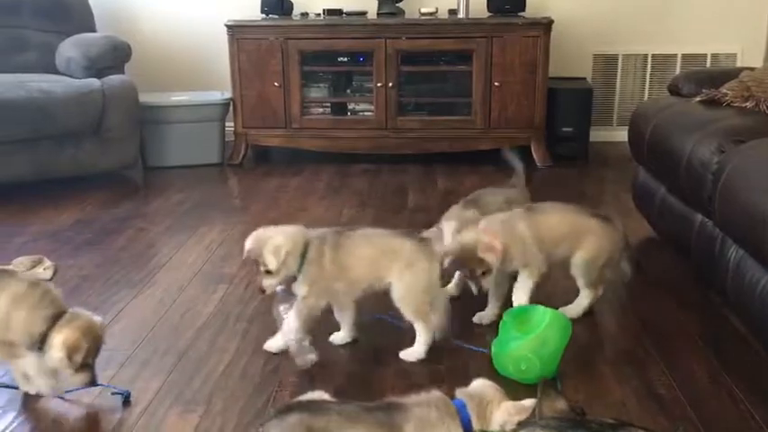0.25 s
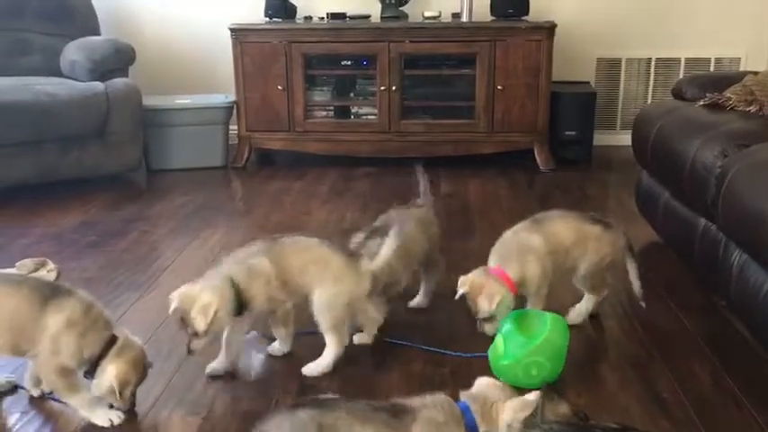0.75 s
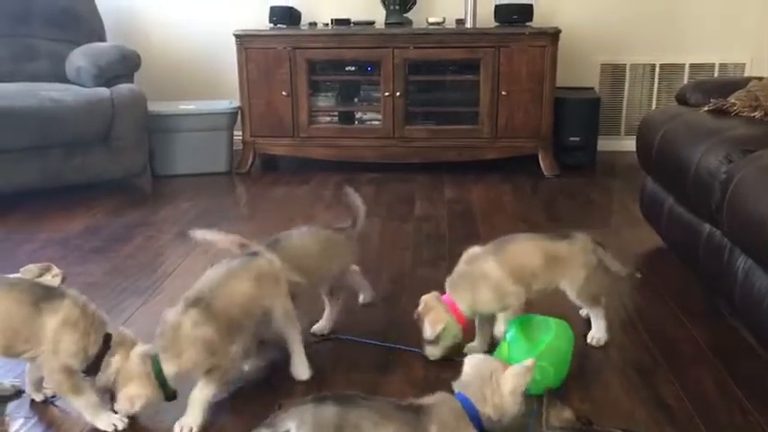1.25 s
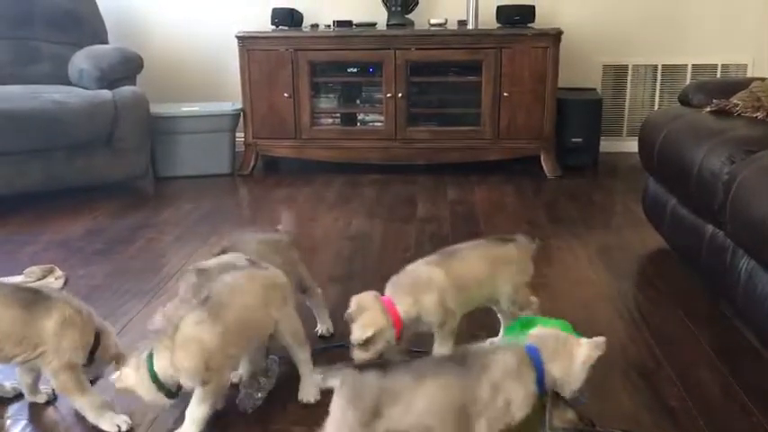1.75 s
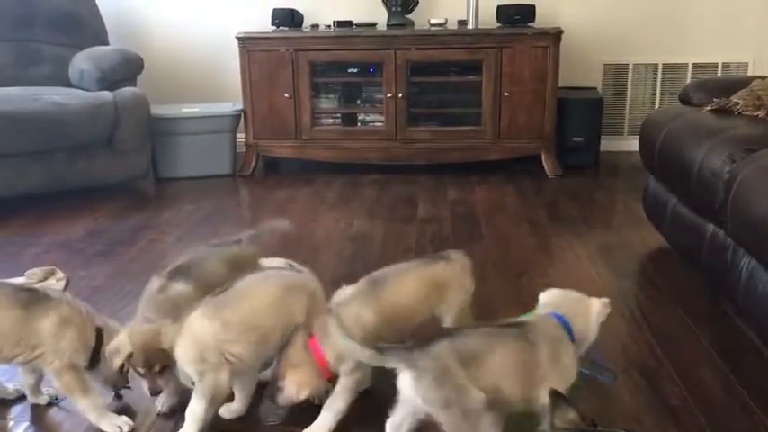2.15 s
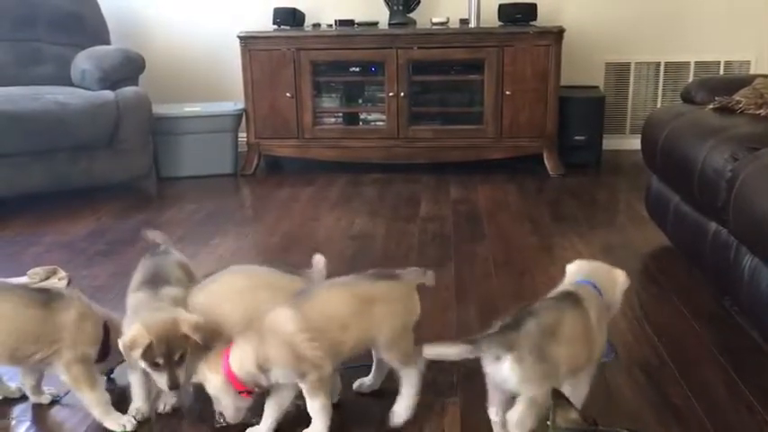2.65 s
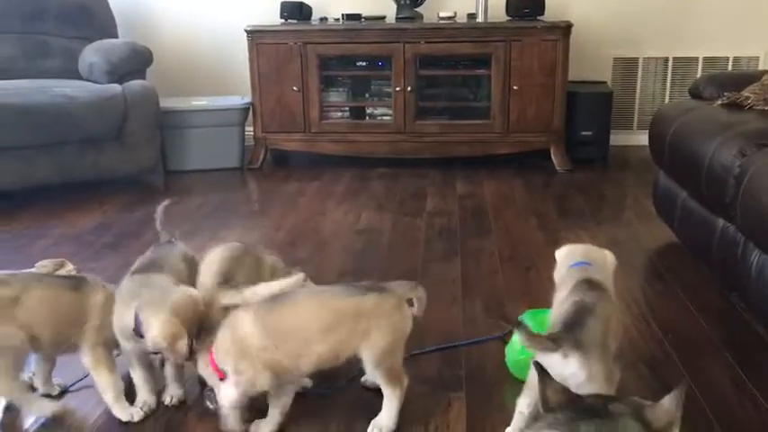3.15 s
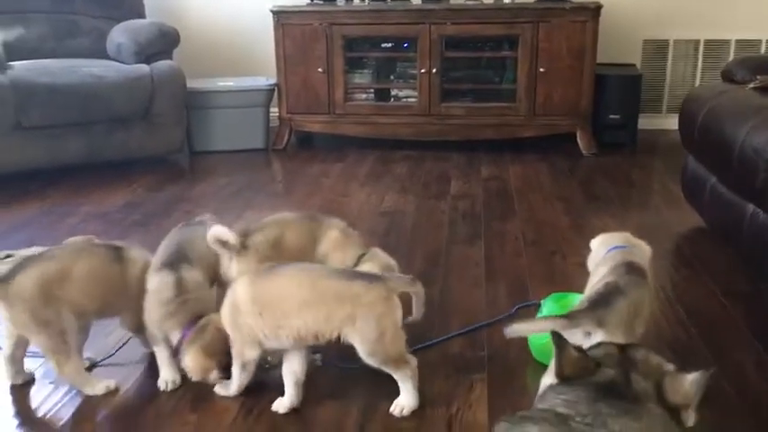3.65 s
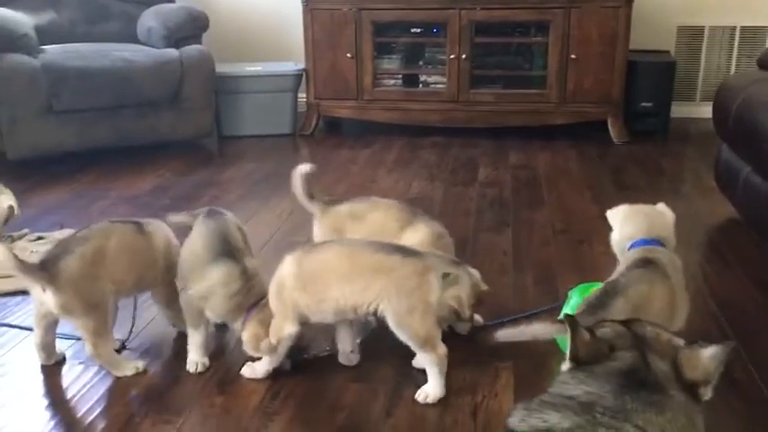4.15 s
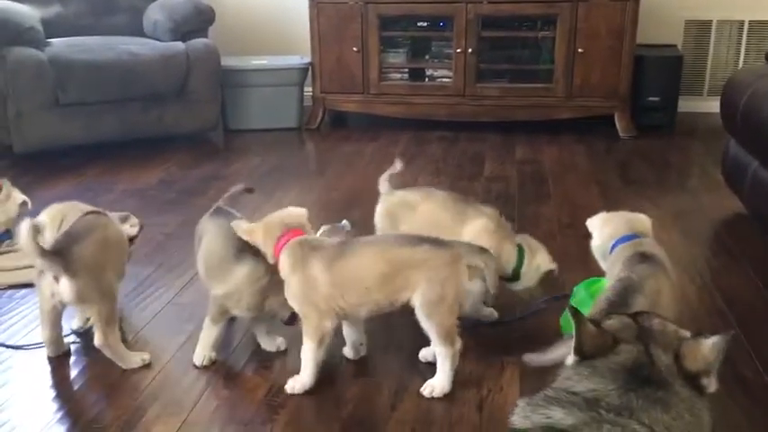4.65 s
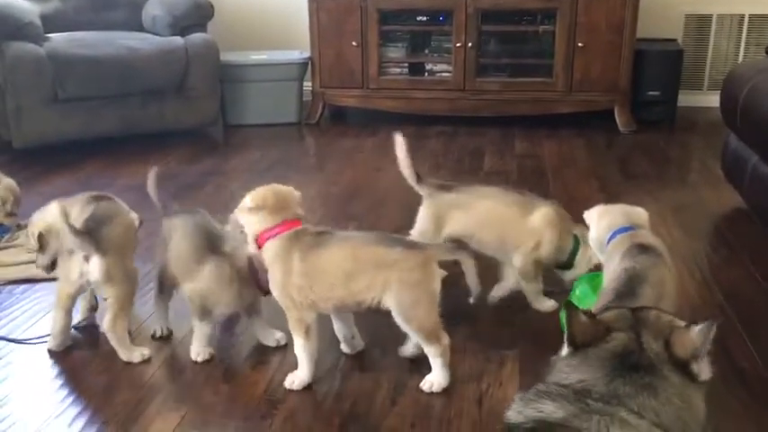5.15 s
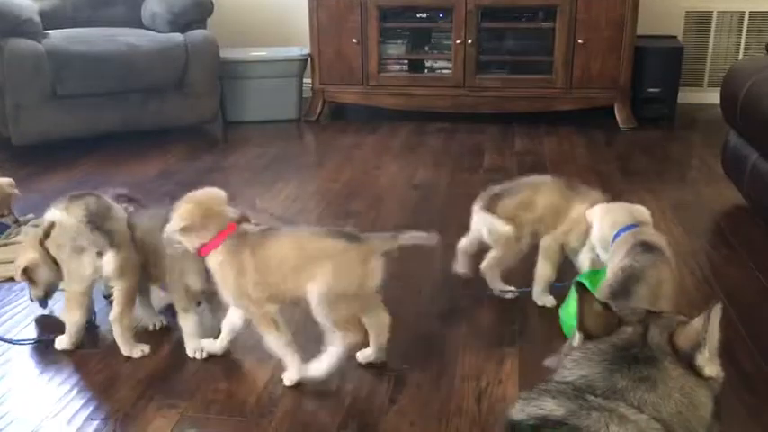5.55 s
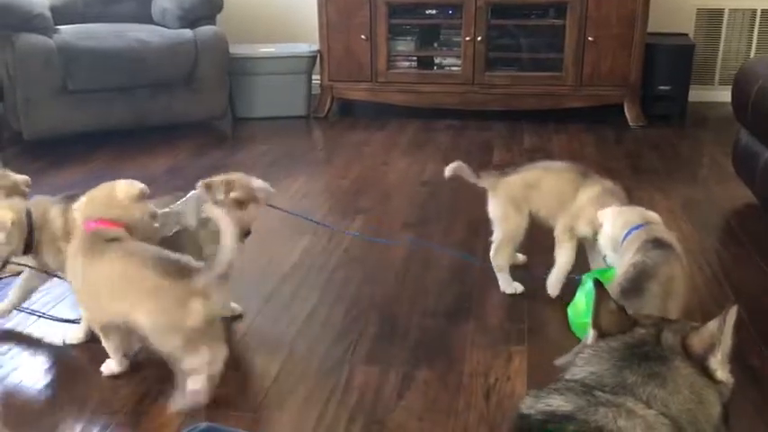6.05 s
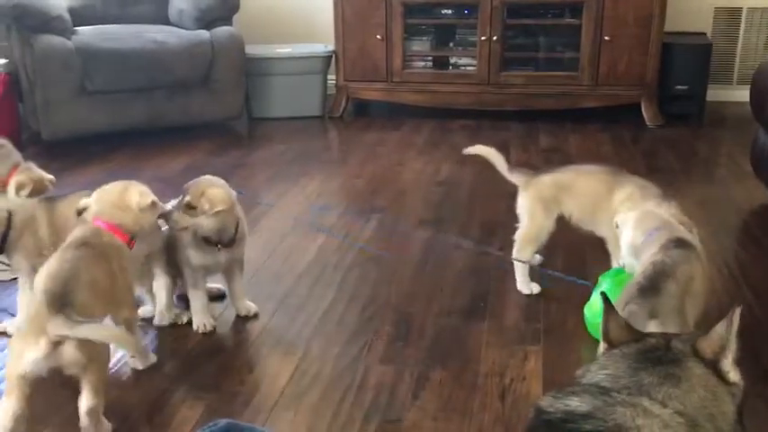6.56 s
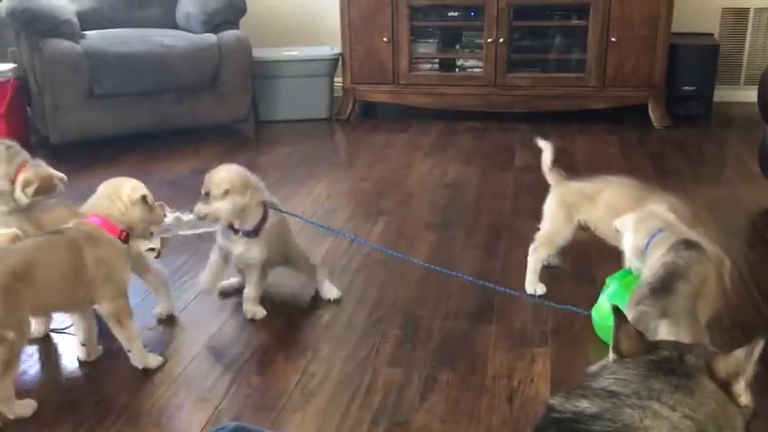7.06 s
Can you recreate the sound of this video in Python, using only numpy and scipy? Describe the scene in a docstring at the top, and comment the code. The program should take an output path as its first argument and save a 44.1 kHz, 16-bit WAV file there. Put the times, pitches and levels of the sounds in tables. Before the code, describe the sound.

Puppies tussle over a thin plastic bottle on hardwood, its sharp crackles and pops mixed with paw thuds, claw ticks and scuffling in a live room.

```python
"""Thin plastic crackles with much room at first, drier from about 2.5 s and wet again near 6.5 s: puppies
tussle on hardwood. Each snap of their bottle is a noise burst plus panel and bottle rings; its edge judders as
ringing catches that weaken towards the end. Paws and toys thud and set boards ringing; a hollow toy answers
bumps with modes. Claws tick, and random slips make the scrapes and scuffling between blows; the scuffling
follows the litter. Soft floor booms, low rumble and faint hiss lie beneath; a live room and a phone microphone
colour the mix."""
import sys
import numpy as np
from scipy import signal
from scipy.fft import rfft, irfft, next_fast_len
from scipy.io import wavfile
from scipy.ndimage import uniform_filter1d

SR = 44100
rng = np.random.default_rng(int(sys.argv[2]) if len(sys.argv) > 2 else 0)


def dump(signal):
    """Clip the signal to [-1, 1] and save it as 16-bit WAV at the path in sys.argv[1]."""
    limited = np.clip(np.atleast_2d(signal).T, -1, 1)
    pcm = np.round(limited * 32767).astype(np.int16)
    wavfile.write(sys.argv[1], SR, pcm)


N = 321930
TIME = np.arange(N) / SR  # s

# Table levels are relative: the functions below trim, scatter or normalise them.
# bottle wall buckling: t/s, level/dB, ring f/Hz, ring level/dB, body tilt/dB, treble tilt/dB
SNAPS = [(0.018, -30, 1770, -1.5, -2.5, 1), (0.4037, -52, 3370, 9, -26, 3), (0.4612, -47, 3420, 3, 4, 2),
         (0.5141, -24, 1470, -17, -0.5, -1), (0.6202, -30, 880, -8, 4.5, -6.5),
         (0.8491, -28.5, 850, -7, 11, -8.5), (1.0425, -36.5, 1500, -12, 8, -4),
         (1.0677, -29, 755, 0.5, -3, -2), (1.0785, -41, 800, 0, 14, -8),
         (1.1504, -31.5, 2320, -0.5, 4.5, -15), (1.342, -39.5, 3220, -15, 12, -1.5),
         (1.4916, -49, 3800, -1, -16, 0), (1.5046, -41, 1150, -19, 4, -25), (2.217, -38, 1450, -6, 4, -7),
         (2.431, -51.5, 3060, -6, -2, -1), (2.5611, -31.5, 2320, -7.5, -3.5, -5),
         (2.7402, -33, 8800, -3, 0, 8), (2.842, -38, 2280, -4.5, -7, 3.5), (3.067, -31, 4200, -5.5, 5, 4),
         (3.0748, -34.5, 1110, -1.5, 7, 0), (3.3068, -34.5, 660, -0.5, 13, -45),
         (3.3392, -39, 1260, -18, 2, -15.5), (3.3697, -35, 6570, -2, 1.5, 1),
         (3.376, -30, 2310, -12, 3.5, 0.5), (3.4761, -29, 3730, -3, -9, 15),
         (3.489, -34.5, 3430, -2, 10, 4), (3.5452, -36, 8150, 0, 5, 5),
         (3.655, -32.5, 800, -0.5, -0.5, -10), (3.661, -41.5, 4270, 0.5, -8, 2),
         (3.955, -42, 780, -2, -2, -13), (3.9778, -31, 2100, -10, 7.5, -0.5),
         (3.99, -32, 1620, -12, -7, -35), (4.0992, -46, 2110, -6, 19, 21), (4.2584, -51, 3400, -2, 10, -12),
         (5.1499, -56, 2200, -10, -4, 5), (5.364, -49.5, 1240, 0, -9, -7),
         (5.6589, -37.5, 3940, -8.5, 2, 1.5), (5.8525, -47, 794, -6, 8, -51),
         (5.9093, -45.5, 1870, -11, -5, 2), (5.9234, -37.5, 1900, -8, 6.5, 6),
         (5.9305, -37, 1520, -11, 0, -2), (5.972, -39, 1490, -14, -13, -1),
         (5.9813, -33, 1400, -8.5, -4.5, -0.5), (6.0742, -38, 9450, 6, -8, -1),
         (6.1133, -33.5, 1340, -1, -13, 1), (6.1405, -30, 8100, 0, -2.5, 9),
         (6.1592, -38.5, 6900, 5, 1, 11), (6.3716, -42, 4040, 1, -18, 4), (6.382, -41.5, 2100, 0, -15, -1),
         (6.457, -42, 1650, -25, -1.5, -8.5), (6.853, -46, 1300, -0.5, 1.5, -21),
         (6.9192, -48, 3570, 5, -3, 1), (7.2555, -29, 1530, 6.5, -9, 1)]
# bottle crushed between jaws: start t/s, length t/s, crease level/dB, ring f/Hz
CRUMPLES = [(0.0, 0.017, -40.5, 7400), (1.067, 0.041, -54, 3150), (4.199, 0.08, -58, 3040),
            (5.989, 0.075, -45.5, 2950), (6.145, 0.045, -45.5, 8100)]
# spectrum of a snap: f/Hz, level/dB
PLASTIC_COLOUR = [(60, -31.5), (200, -3.5), (400, -10.5), (750, -3.5), (1100, -4), (2000, -1), (3000, -7),
                  (5000, -4), (7000, -3), (9300, -0.5), (10500, -9), (12500, -17), (16000, -30)]
# modes of the whole bottle: f/Hz, level/dB, t60/s
BOTTLE_MODES = [(815, 0, 0.21), (910, 6, 0.019), (1105, 1, 0.05), (1298, 2, 0.12), (1545, 11, 0.033),
                (1810, -28, 0.12), (2480, -12, 0.094), (3607, 20, 0.012)]
# room's share of the snaps, creases and claw ticks: t/s, level/dB
BOTTLE_ROOM = [(0, 4), (0.6, 2), (1.0, 1), (2.5, -3.5), (4.0, -2), (5.9, 1), (6.45, 4), (7.25, -1)]
# bottle edge juddering over boards or teeth: start t/s, length t/s, level/dB, ring f/Hz
JUDDERS = [(1.148, 0.13, -59, 2360), (1.157, 0.16, -49, 1570), (1.413, 0.046, -50, 3480),
           (2.567, 0.076, -48, 2370), (2.569, 0.044, -46, 2860), (2.85, 0.09, -53, 2380)]
# paws and toys landing on the boards: t/s, level/dB, ring f/Hz, ring level/dB, hardness/dB
KNOCKS = [(0.162, -46, 169, 1.5, -35), (0.23, -46.5, 839, -3.5, 8.5), (0.517, -37, 819, 12, -15),
          (0.622, -35, 207.7, 8, -16), (0.814, -44, 156, -2, 13), (0.85, -30, 394.4, 0, -1.5),
          (0.93, -45, 202, 9, 3), (0.975, -45, 383, 5, 13), (1.043, -32.5, 500.6, -1.5, 3),
          (1.068, -44, 234, 0, 1), (1.1215, -30.5, 665, 6.5, 14), (1.344, -39.5, 206.4, -4, 1),
          (1.412, -48, 212, -16, -3), (1.505, -37.5, 332, 0.5, 1.5), (2.219, -43, 312, -3, 7.5),
          (2.229, -42, 212, -3, 3), (2.69, -52, 365, -1, 4.5), (2.811, -46.5, 200, -6, 9.5),
          (2.94, -47.5, 354, -5, -6), (2.957, -49, 427, -7, 8), (3.228, -51, 490, 6, -1),
          (3.307, -44.5, 428, 0, -1), (3.378, -47.5, 191, 6, -26), (3.89, -52, 650, -12, 18),
          (4.37, -58, 399, -6, 3), (4.471, -59, 510, 9, 0), (4.655, -52.5, 191, 22, -36),
          (5.512, -59.5, 300, -0.5, 7), (6.05, -53, 528, 7, 5), (6.138, -55, 205, -4, 4),
          (6.456, -49.5, 310, -8, 2), (6.773, -55, 342, -2, -4), (7.089, -55, 520, -1, 2),
          (7.132, -50.5, 483, 1, 2.5)]
# modes of the floorboards: f/Hz, level/dB, t60/s
BOARD_MODES = [(206.4, 0.5, 0.41), (280, -2.5, 0.37), (391, -9.5, 0.21), (568, 1.5, 0.17), (687, -12, 0.36),
               (744, 14, 0.024), (799, -6.5, 0.31), (930, -17, 0.31), (1090, -15, 0.42), (1460, -11, 0.35)]
# hollow toy being bumped: t/s, level/dB
BUMPS = [(1.07, -42), (1.124, -40), (1.163, -48), (2.219, -46.5), (6.458, -45.5), (7.135, -58)]
# modes of the hollow plastic toy: f/Hz, level/dB, t60/s
TOY_MODES = [(571, -4, 0.19), (641, 3.5, 0.11), (743, -1, 0.2), (787, -7, 0.32), (829, -10, 0.3),
             (930, -16, 0.21)]
# claws and plastic sliding over the boards: start t/s, length t/s, level/dB, centre f/Hz
SCRAPES = [(0.0, 0.008, -26, 5600), (0.12, 0.18, -48.5, 1340), (0.394, 0.058, -55, 3340),
           (0.513, 0.04, -48, 12000), (0.522, 0.2, -43.5, 1190), (0.908, 0.11, -54.5, 10800),
           (1.315, 0.035, -54, 12100), (1.384, 0.43, -62, 3860), (1.764, 0.062, -56.5, 2800),
           (2.028, 0.074, -59, 6200), (2.138, 0.099, -59.5, 8750), (2.193, 0.1, -53, 1500),
           (2.218, 0.022, -42, 3100), (2.429, 0.18, -51.5, 3820), (2.797, 0.072, -50, 1350),
           (2.94, 0.085, -54, 4160), (3.666, 0.24, -55.5, 1040), (4.187, 0.11, -53, 1470),
           (4.19, 0.09, -71, 4200), (4.561, 0.12, -65.5, 3900), (6.376, 0.064, -56, 5800),
           (6.736, 0.25, -61.5, 6860), (7.219, 0.025, -48.5, 1410), (7.219, 0.027, -52, 4970)]
# how busy the litter is: t/s, scuffling level/dB
BUSTLE = [(0, -57.5), (1.25, -55.5), (1.5, -51.5), (1.9, -61.5), (2.4, -50.5), (3.6, -53.5), (4.25, -52),
          (4.5, -73.5), (5.3, -66), (5.5, -58), (6.2, -57.5), (6.7, -57), (7.3, -52.5)]
# spectrum of the steady background: f/Hz, density level/dB per Hz
AIR_COLOUR = [(31, -23), (44, -13.5), (62, -14.5), (100, -19), (160, -26.5), (290, -25.5), (400, -37),
              (1600, -45.5), (4000, -50), (9000, -58), (16000, -62)]
# spectrum of the room's answer: f/Hz, level/dB
ROOM_COLOUR = [(100, -3.5), (300, 1), (800, 5), (2200, -1), (8000, -3.5), (11000, -4.5), (16000, -11)]
# decay of the room's tail: f/Hz, t60/s
ROOM_T60 = [(150, 0.65), (700, 0.4), (2200, 0.64), (5000, 0.56), (9000, 0.39), (15000, 0.42)]
# response of the phone's microphone: f/Hz, level/dB
MICROPHONE = [(18, -23), (45, 0.5), (9600, 0), (10600, -1), (12500, 4)]


def snaps(spots, rise_s=0.0018, flip_t60=0.0088, chatter_t60=0.033, chatter_db=-6,
          ring_cycles=10, ring_room_db=-4, bottle_db=-9, gain_db=23):
    """A wall flips fast, its creases chatter, and the panel and whole bottle ring; claw ticks share this voice."""
    out = np.zeros(N)
    t = np.arange(4096) / SR
    events = SNAPS + creases() + claws()
    for k, (s, db, hz, ring_db, body_db, treble_db) in enumerate(events):
        flip, chatter = rng.standard_normal((2, len(t)))
        flip = np.tanh(flip) * np.minimum(t / rise_s, 1) * fade(t, flip_t60)
        chatter = chatter ** 3 * fade(t, chatter_t60)  # cubing leaves sparse, spiky crackle
        bottle = unit(modes(t, BOTTLE_MODES, scatter_octaves=0.033))
        push = unit(flip) + undb(chatter_db) * unit(chatter) + undb(bottle_db) * bottle

        tilt = [(1000, body_db - 2.0), (1900, 0.012), (3300, 0), (5500, treble_db - 3.5),
                (9000, treble_db - 9.0), (13000, treble_db - 0.4)]
        crack = unit(colour(push, PLASTIC_COLOUR, tilt))
        panel = undb(ring_db) * flex(t, hz, ring_cycles)

        # summed over all directions the crack has a more even spectrum
        click = unit(colour(signal.unit_impulse(len(t)), PLASTIC_COLOUR, tilt))
        spread = unit(click + 0.26 * crack)
        room_gain = undb(follow(s, BOTTLE_ROOM))
        radiated = room_gain * unit(spread + undb(ring_room_db) * panel)
        size = undb(db + gain_db)
        place(out, s, size * unit(crack + panel), size * radiated, spots[k % len(spots)])
    return out


def creases(count=6, scatter_db=3, scatter_octaves=0.11, ring_db=-3, body_db=-10, treble_db=0):
    """Each crumple is a run of small thin snaps, uneven in spacing, size and pitch."""
    events = []
    for s, length, db, hz in CRUMPLES:
        for k in range(count):
            at = s + length * (k + rng.random()) / count
            level = db + scatter_db * rng.standard_normal()
            pitch = hz * 2 ** (scatter_octaves * rng.standard_normal())
            events.append((at, level, pitch, ring_db, body_db, treble_db))
    return events


def flex(t, hz, cycles, swell_cycles=1.42):
    """A thin panel's ring builds up over a cycle or so and dies away after a set number of cycles."""
    swell = 1 - np.exp(-(t * hz / swell_cycles) ** 2)
    return unit(ring(t, hz, cycles / hz) * swell)


def judders(catch_s=0.0067, scatter_db=4, scatter_octaves=0.079, ring_cycles=26):
    """The edge catches and lets go at uneven intervals, ringing a panel each time, more weakly towards the end."""
    out = np.zeros(N)
    t = np.arange(2048) / SR
    for s, length, db, hz in JUDDERS:
        gaps, sizes, pitches = rng.standard_normal((3, 64))
        catches = np.cumsum(catch_s * np.exp(gaps / 2)) - catch_s
        for at, size, pitch in zip(catches[catches < length], sizes, pitches):
            strength = undb(db + scatter_db * size) * np.sqrt(catch_s * SR * (1 - at / length))
            panel = flex(t, hz * 2 ** (scatter_octaves * pitch), ring_cycles)
            add(out, s + at, strength * panel)
    return out


def knocks(spots, rise_s=0.0019, contact_t60=0.088, note_t60=0.2, note_hz=300, boards_db=-1,
           room_db=-3, note_room_db=-6, firm_db=-40, doubling_db=18, gain_db=31):
    """A blunt contact thuds, the thing that lands gives its own hollow note, and the boards ring on."""
    out = np.zeros(N)
    t = np.arange(SR // 3) / SR
    for k, (s, db, hz, ring_db, hard_db) in enumerate(KNOCKS):
        # a light paw stays down and damps what it has set ringing
        free = 2 ** (min(db - firm_db, 0) / doubling_db)
        rise = np.minimum(t / rise_s, 1)
        contact = rng.standard_normal(len(t)) * rise * fade(t, contact_t60 * free)
        boards = modes(t, BOARD_MODES)
        hardness = [(30, -69), (90, -8.5), (180, 3), (380, 4.0), (600, hard_db - 2),
                    (900, hard_db - 9.0), (1500, hard_db - 12.0), (2500, hard_db - 25.5),
                    (3200, hard_db - 13.5), (9000, hard_db - 39.5)]
        boards = free * undb(boards_db) * unit(colour(boards, hardness))
        thud = unit(unit(colour(contact, hardness)) + boards)

        t60 = free * note_t60 * np.sqrt(note_hz / hz)  # higher notes die sooner
        note = undb(ring_db) * unit(ring(t, hz, t60)) * rise
        size = undb(db + gain_db) / np.hypot(1, undb(ring_db))
        radiated = undb(room_db) * (thud + undb(note_room_db) * note)
        place(out, s, size * (thud + note), size * radiated, spots[k % len(spots)])
    return out


def bumps(spots, rise_s=0.0026, room_db=-5, gain_db=31):
    """The hollow toy rings on with a cluster of close, beating modes."""
    out = np.zeros(N)
    t = np.arange(SR // 2) / SR
    for k, (s, db) in enumerate(BUMPS):
        cluster = modes(t, TOY_MODES, scatter_db=2.0, scatter_octaves=0.012)
        note = undb(db + gain_db) * unit(cluster * np.minimum(t / rise_s, 1))
        place(out, s, note, undb(room_db) * note, spots[k % len(spots)])
    return out


def claws(count=36, over_bustle_db=-4.5, scatter_db=2, ring_hz=3600, scatter_octaves=0.39,
          ring_db=-4, body_db=-3, treble_db=-1):
    """Claws tick on the boards at random moments, harder the busier the litter is."""
    events = []
    times = scattered_times(count)
    for s, (size, pitch) in zip(times, rng.standard_normal((count, 2))):
        level = follow(s, BUSTLE) + over_bustle_db + scatter_db * size
        hz = ring_hz * 2 ** (scatter_octaves * pitch)
        events.append((s, level, hz, ring_db, body_db, treble_db))
    return events


def scrapes(rate=7000, spread_db=0.5, rise_share=0.37, width_octaves=1.29, skirt=3.3):
    """Each stroke is a dense run of slips that swells and dies away in its own band."""
    out = np.zeros(N)
    edge = 2 ** (width_octaves / 2)
    for s, length, db, hz in SCRAPES:
        stroke = np.interp(TIME[:SR // 2] / length, [0, rise_share, 1], [0, 1, 0])
        grains = band(slips(rate, spread_db, len(stroke)), hz / edge, hz * edge)
        grains = band(grains, hz / edge / skirt, hz * edge * skirt)  # wider band steepens the far skirts
        add(out, s, undb(db) * np.sqrt(stroke) * grains / np.std(grains))
    return out


def scuffle(pad_db=-10, rub_db=-6, scratch_db=-11):
    """Pads patter, fur and plastic rub the boards, claws and creases scratch, as loud as the litter is busy."""
    padding = friction(120, 1.8, 154, 640) * undb(pad_db)
    rubbing = friction(2500, 2.0, 370, 2070) * undb(rub_db)
    scratching = friction(4000, 2.0, 2000, 9700) * undb(scratch_db)
    return (padding + rubbing + scratching) * undb(follow(TIME, BUSTLE))


def friction(rate, spread_db, lo_hz, hi_hz):
    """Tiny slips of very uneven size swell and thin in spurts; rms one."""
    spurts = undb(2 * walk(16))
    grains = band(slips(rate, spread_db, N), lo_hz, hi_hz) * spurts
    return grains / np.std(grains)


def slips(rate, spread_db, size):
    """Surfaces let go in tiny clicks at random moments (rate per second), of very uneven size."""
    hits = rng.random(size) < rate / SR
    strength = rng.standard_normal(size)
    excess = np.minimum(rng.exponential(size=size), 4)
    return hits * strength * undb(spread_db * excess)


def joists(count=48, boom_hz=59, boom_t60=0.16, rise_s=0.025, scatter_db=3, boom_db=-65):
    """Soft footfalls set the whole floor booming, unevenly."""
    out = np.zeros(N)
    t = np.arange(SR // 2) / SR
    boom = ring(t, boom_hz, boom_t60) * np.minimum(t / rise_s, 1)
    times = scattered_times(count)
    for s, size in zip(times, rng.standard_normal(count)):
        add(out, s, undb(scatter_db * size) * boom)
    return out / np.std(out) * undb(boom_db)


def background(rms_db=-61.5):
    """Filtered noise: the house rumbles low under a faint even hiss."""
    air = colour(rng.standard_normal(N), AIR_COLOUR)
    return air / np.std(air) * undb(rms_db)


def room_responses(count=12, first_s=0.0097, echoes_db=-7, echoes_t60=0.05, echo_rate=900):
    """Each spot gets random early echoes and a diffuse tail whose frequency bands die at their own rates."""
    t = np.arange(SR // 2) / SR
    hz = np.fft.rfftfreq(len(t), 1 / SR)
    noise = rfft(rng.standard_normal((count, len(t))))
    centres, t60s = np.transpose(ROOM_T60)
    tails = np.zeros((count, len(t)))
    for share, t60 in zip(np.eye(len(t60s)), t60s):
        weight = lookup(hz, np.c_[centres, share])  # one overlapping band of the noise
        tails += irfft(noise * weight, len(t)) * fade(t, t60)
    tails *= np.clip(t / first_s, 0, 1) ** 2

    hits = rng.random(tails.shape) < echo_rate / SR
    echoes = hits * np.tanh(rng.standard_normal(tails.shape))
    echoes *= (t > first_s) * fade(t, echoes_t60)
    return [colour(unit(unit(tail) + undb(echoes_db) * unit(early)), ROOM_COLOUR)
            for tail, early in zip(tails, echoes)]


def place(track, s, heard, radiated, response):
    """Lay in the direct sound and the room's answer to what is radiated all round."""
    add(track, s, heard)
    add(track, s, signal.fftconvolve(radiated, response))


def modes(t, table, scatter_db=3.5, scatter_octaves=0.0053):
    """Each point of attack favours other modes, and the grip on the thing shifts their pitch."""
    signs = rng.choice([-1, 1], len(table))
    shares = undb(rng.normal(0, scatter_db, len(table))) * signs
    shifts = 2 ** (scatter_octaves * rng.standard_normal(len(table)))
    return sum(share * undb(db) * ring(t, hz * shift, t60)
               for (hz, db, t60), share, shift in zip(table, shares, shifts))


def ring(t, hz, t60):
    """One struck mode: a decaying sine."""
    return np.sin(2 * np.pi * hz * t) * fade(t, t60)


def fade(t, t60):
    """Exponential decay by 60 dB in t60 seconds."""
    return np.exp(-np.log(1000) * t / t60)


def scattered_times(count):
    """One random moment in each of count equal slots, in seconds."""
    return (np.arange(count) + rng.random(count)) * N / SR / count


def walk(rate):
    """Slow random wander, stepped at rate per second and smoothed, with a spread near one."""
    k = int(SR / rate)
    held = np.repeat(rng.standard_normal(N // k + 1), k)
    return uniform_filter1d(uniform_filter1d(held, k), k)[:N] * np.sqrt(2)


def colour(x, *spectra):
    """Causal minimum-phase filter that follows one or more lists of (Hz, dB) points."""
    size = 2 * next_fast_len(len(x) // 2 + 1024, True)
    hz = np.fft.rfftfreq(size, 1 / SR)
    db = sum(lookup(hz, points) for points in spectra)
    cepstrum = irfft(db * np.log(10) / 20)
    # folding the cepstrum forward makes the filter causal
    cepstrum[1:size // 2] *= 2
    cepstrum[size // 2 + 1:] = 0
    return irfft(rfft(x, size) * np.exp(rfft(cepstrum)))[:len(x)]


def band(x, lo_hz, hi_hz):
    """Band-pass."""
    sos = signal.butter(2, [lo_hz, min(hi_hz, .45 * SR)], "band", fs=SR, output="sos")
    return signal.sosfilt(sos, x)


def lookup(hz, points):
    """Read (Hz, value) points on a log-frequency axis."""
    f, value = np.transpose(points)
    return np.interp(np.log(np.maximum(hz, 1)), np.log(f), value)


def follow(s, points):
    """Read (s, value) points at time s."""
    return np.interp(s, *np.transpose(points))


def undb(db):
    """Decibels to gain."""
    return 10 ** (np.asarray(db) / 20)


def unit(x):
    """Scale to an energy of one."""
    return x / np.sqrt(np.sum(x ** 2))


def add(track, s, sound):
    """Lay a sound into a track at time s."""
    start = max(int(s * SR), 0)
    track[start:start + len(sound)] += sound[:max(N - start, 0)]


def scene():
    """Blows, scuffs and judders come directly and by way of the room, over the boom and background."""
    spots = room_responses()
    friction_bed = np.zeros(N)
    scuff = scuffle() + scrapes()
    place(friction_bed, 0, undb(-5.0) * scuff, undb(-6.5) * scuff, spots[-1])
    judder = judders()
    place(friction_bed, 0, undb(-6.5) * judder, undb(-10.5) * judder, spots[-2])
    blows = snaps(spots) + knocks(spots) + bumps(spots)
    return (blows + friction_bed + joists() + background())[None]


def record(dry, top_hz=16100):
    """The phone colours the sound a little and cuts the top."""
    heard = colour(dry[0], MICROPHONE)[None]
    top_cut = signal.ellip(8, .2, 70, top_hz, fs=SR, output="sos")
    return signal.sosfilt(top_cut, heard)


dry = scene()
out = record(dry)
dump(out)
```